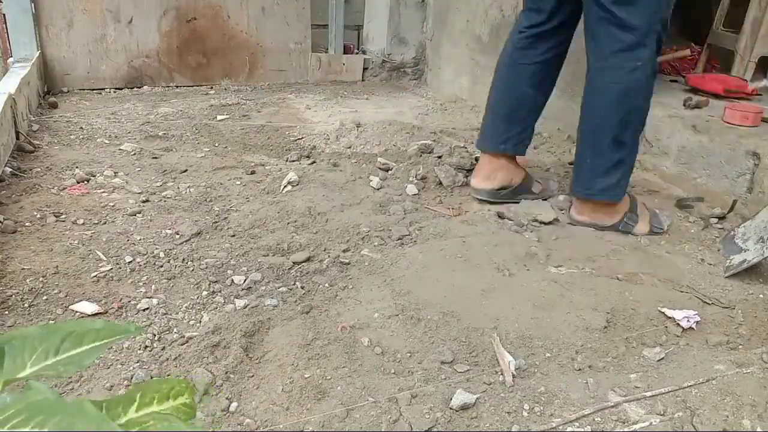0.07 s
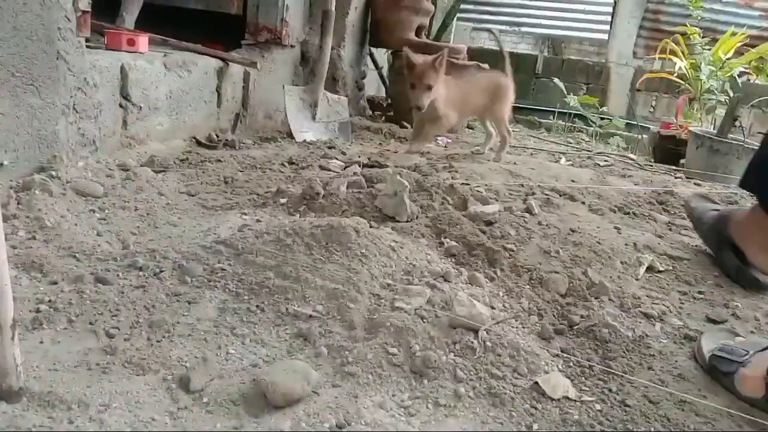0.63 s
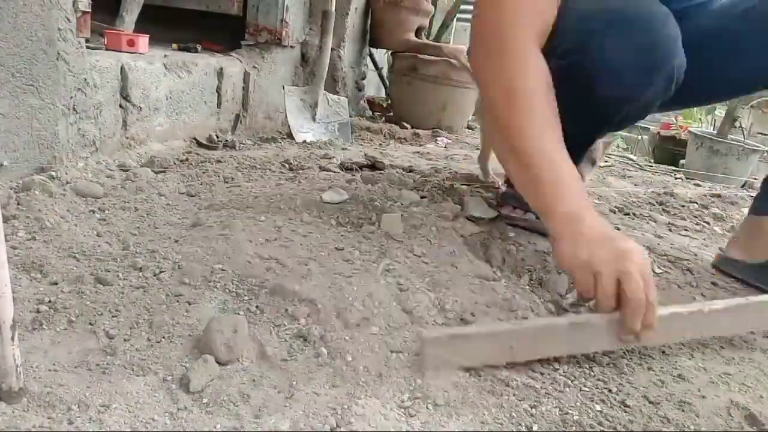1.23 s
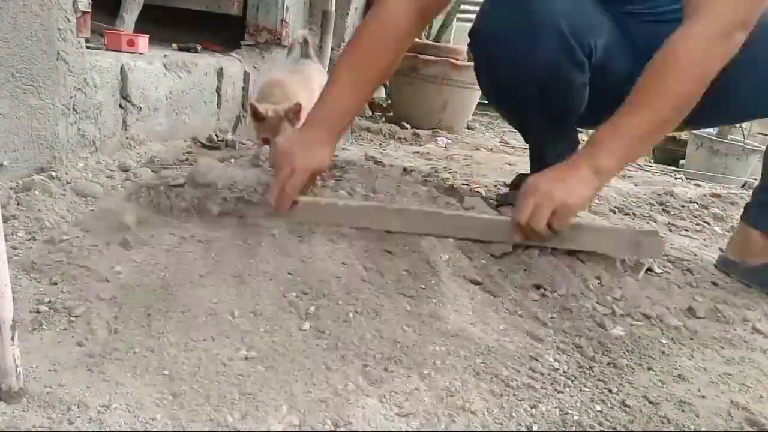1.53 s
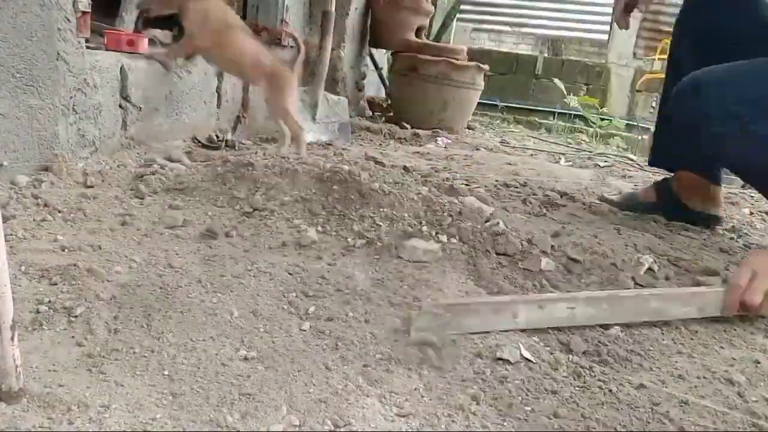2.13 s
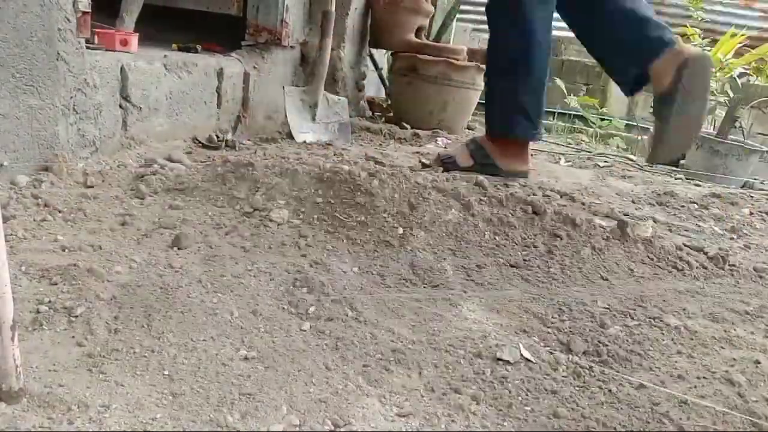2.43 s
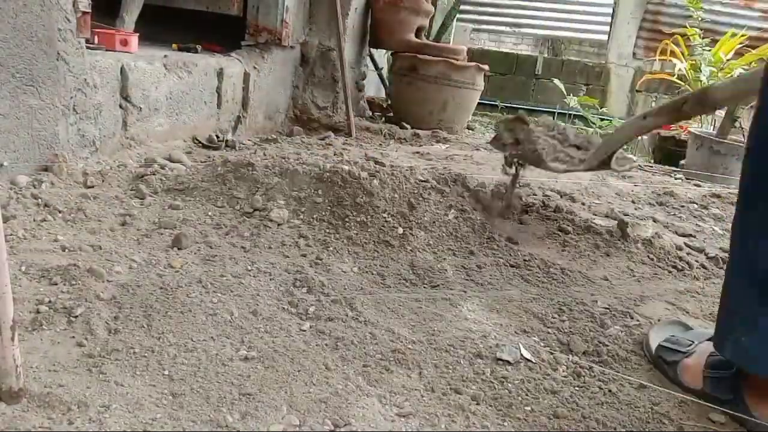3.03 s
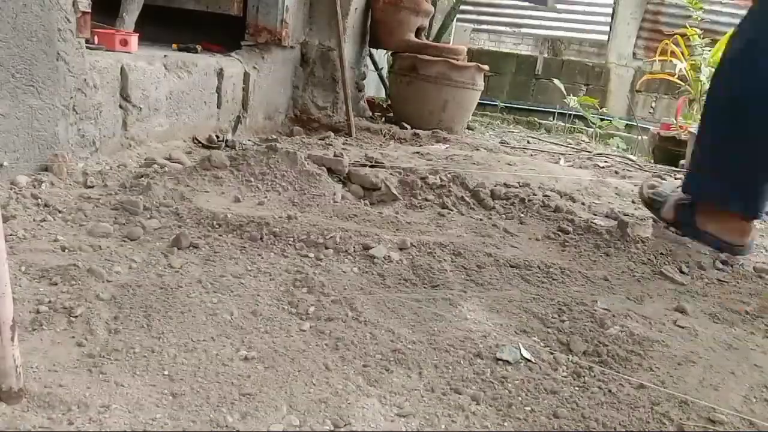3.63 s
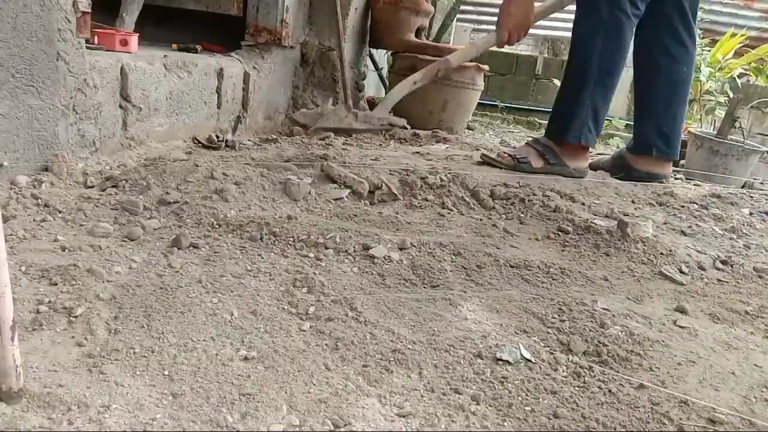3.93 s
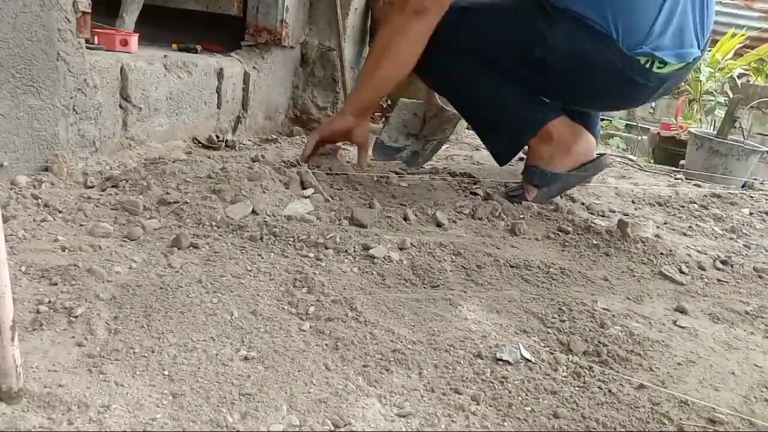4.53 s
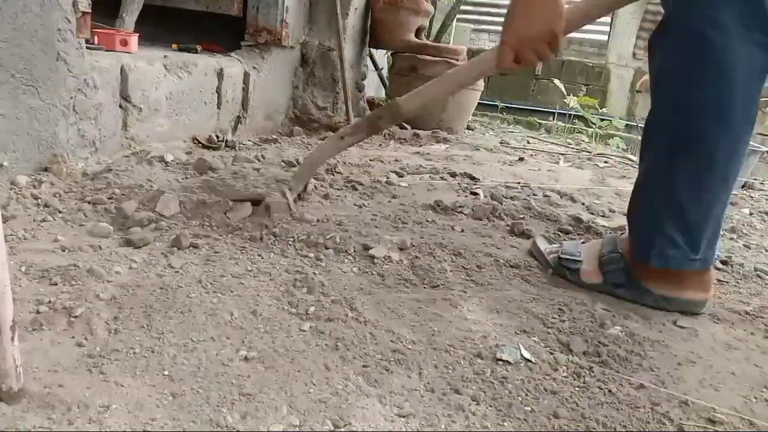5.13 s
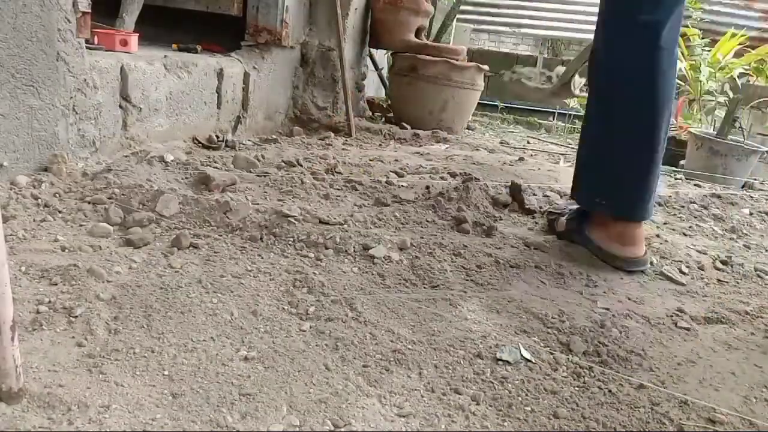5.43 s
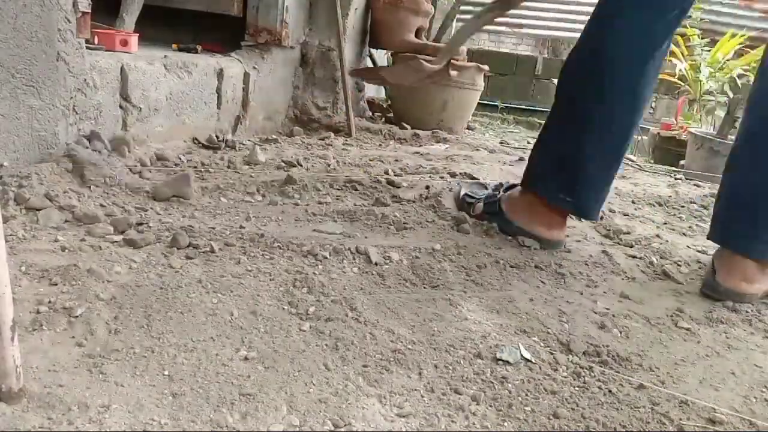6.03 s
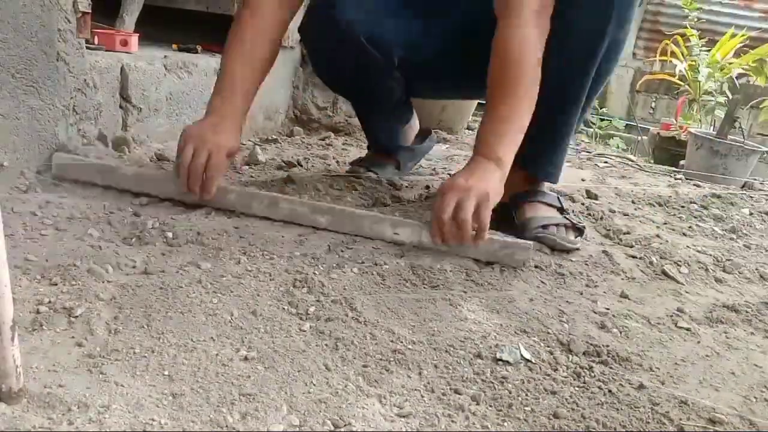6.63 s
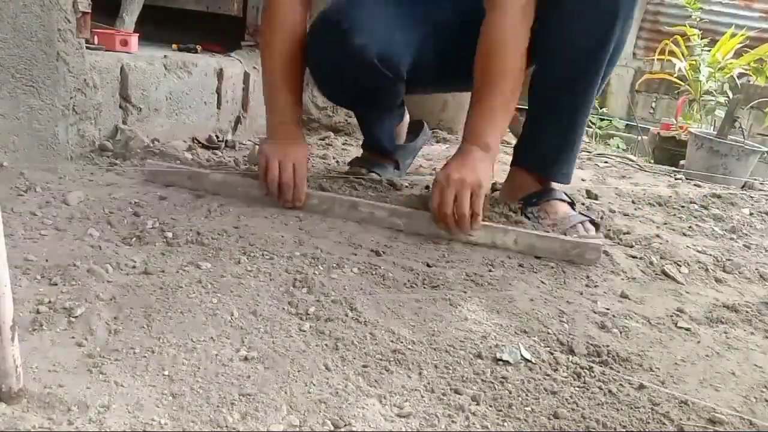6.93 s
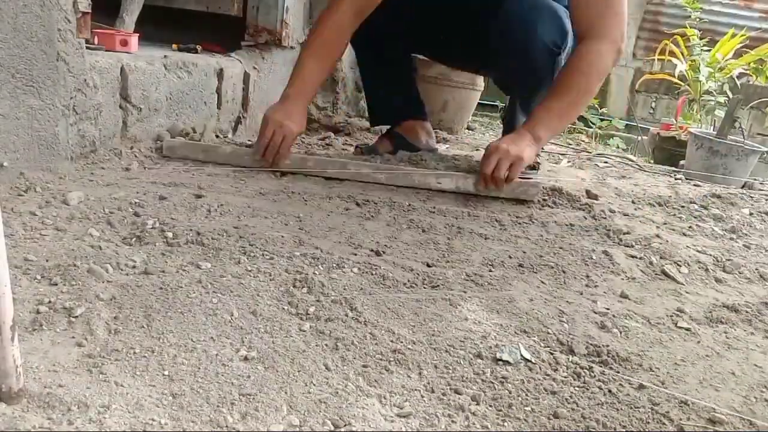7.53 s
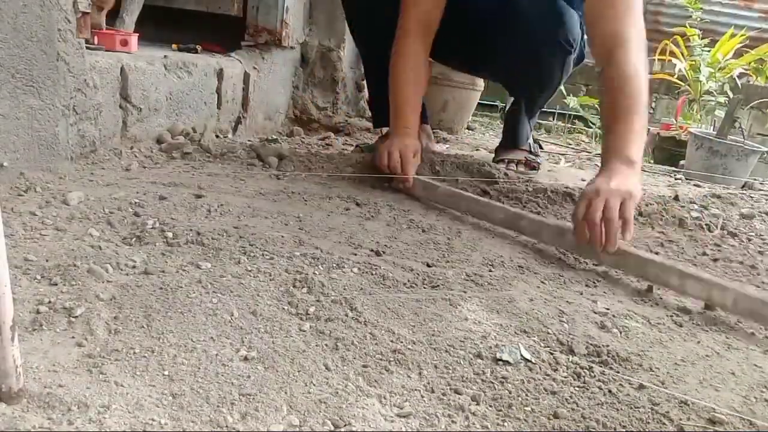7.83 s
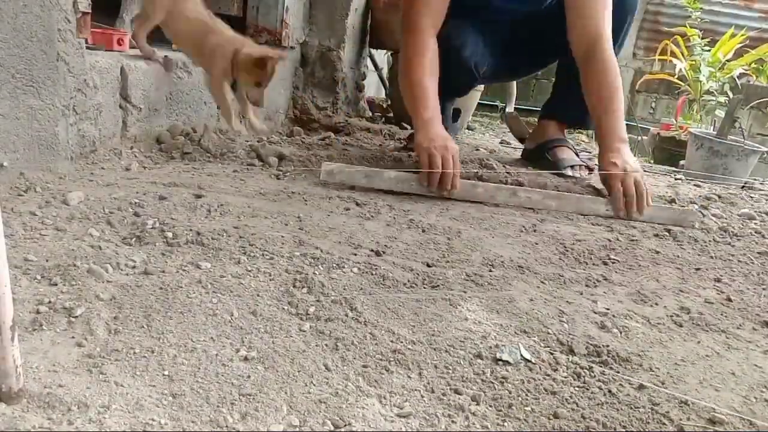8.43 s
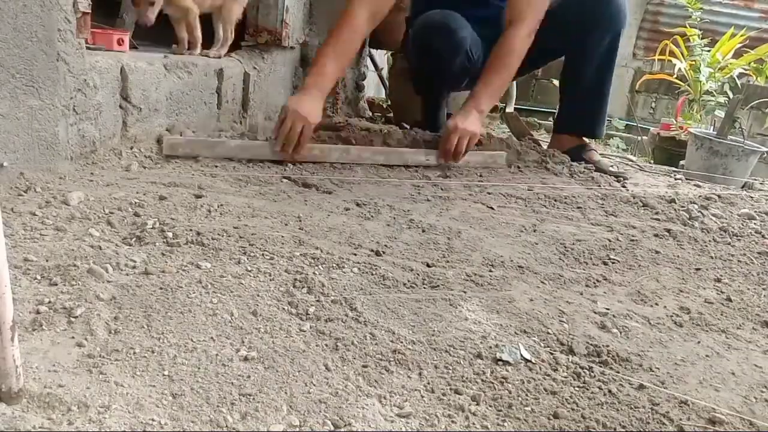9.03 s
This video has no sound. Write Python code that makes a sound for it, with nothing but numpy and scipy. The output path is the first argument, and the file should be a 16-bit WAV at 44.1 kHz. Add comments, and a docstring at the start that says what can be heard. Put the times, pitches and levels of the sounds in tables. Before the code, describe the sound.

Rapid, sped-up scraping of a board on grit gives way to a spade crunching and dumping earth, then more scraping.

```python
"""A yard of dry sandy soil is being levelled, all in quick motion. A wooden board drags over grit in runs
of short strokes, a spade bites and dumps earth, sandals scuff and pebbles click. Friction and crunch
are sums of many tiny collisions; blows excite damped modes. Faint high whines, perhaps from distant
animals, sound over a quiet outdoor rumble and a thin chirr. The small microphone rings near 1.25 kHz."""
import sys
import numpy as np
from scipy.fft import rfft, irfft, next_fast_len
from scipy.io import wavfile
from scipy.ndimage import uniform_filter1d

SR = 44100
rng = np.random.default_rng(int(sys.argv[2]) if len(sys.argv) > 2 else 0)


def write(x):
    x = np.atleast_2d(x).T
    wavfile.write(sys.argv[1], SR, np.round(np.clip(x, -1, 1) * 32767).astype(np.int16))


N = 409248

# Spectra of sliding grit and of crushed grit. Each row: frequency in Hz, relative level in dB.
SLIDING_SPECTRUM = [(50, -9), (200, -8.5), (380, 3), (950, 1), (2800, -4.5), (6000, -13), (15000, -20.5)]
CRUSHING_SPECTRUM = [(50, -17.5), (600, 2), (1800, -4), (3300, -3), (6000, -10.5), (15000, -13.5)]


def amp(db):
    """Amplitude grows tenfold with every 20 dB."""
    return 10 ** (np.asarray(db) / 20)


def unit(x):
    """Normalisation to an rms of 1."""
    return x / np.sqrt(np.mean(x ** 2) + 1e-20)


def fade(t, t60):
    """Exponential damping: the level falls 60 dB in t60."""
    return np.exp(-np.log(1000) * t / t60)


def wobble(rate):
    """Random modulation, interpolated between rate knots a second."""
    knots = rng.standard_normal(int(N * rate / SR) + 2)
    return np.interp(np.arange(N) * rate / SR, np.arange(len(knots)), knots)


def add(track, s, sound):
    """Superposition: a sound joins the track at s seconds."""
    start = round(s * SR)
    part = sound[max(-start, 0):N - start]
    track[max(start, 0):][:len(part)] += part


def shaped(x, envelope):
    """Amplitude modulation, scaled to carry just the energy of the envelope."""
    return unit(x * envelope) * np.sqrt(np.mean(envelope ** 2))


def coloured(x, spectrum, bright_db=0, uneven_db=0, body_hz=1, body_db=0, shelf_hz=2400, body_width=0.27):
    """Minimum-phase filtering by a spectrum, a treble tilt, random bumps and a broad body resonance."""
    size = 2 * next_fast_len(len(x))
    log_hz = np.log(np.fft.rfftfreq(size, 1 / SR) + 1)
    hz, db = np.transpose(spectrum)
    tilt = bright_db * np.tanh(2 * (log_hz - np.log(shelf_hz))) / 2
    bumps = uneven_db * np.interp(log_hz, np.linspace(0, log_hz[-1], num=64), rng.normal(size=64))
    body = body_db / (1 + ((log_hz - np.log(body_hz)) / body_width) ** 2)
    response_db = np.interp(log_hz, np.log(hz), db) + tilt + bumps + body
    cepstrum = irfft(np.log(amp(response_db)))[:size // 2]
    cepstrum[1:] *= 2  # folding the cepstrum makes the filter causal
    return irfft(rfft(x, size) * np.exp(rfft(cepstrum, size)))[:len(x)]


def grains(t, rate, spread_db, sand_db, pebble_hz=3300, pebble_t60=0.014, ping_samples=300):
    """Shot noise: stones collide at random, each ringing at its own pitch, over the hiss of fine sand."""
    when, pitch, weight = rng.random((3, int(rate * len(t) / SR) + 1, 1))
    age = np.arange(ping_samples)
    hz = pebble_hz * 2 ** (4 * pitch - 2)  # two octaves either way
    gain = amp(-spread_db * np.log(weight + 1 / 20)) * hz  # many weak, a few strong
    t60 = pebble_t60 * np.sqrt(pebble_hz / hz)  # small high stones ring the shortest
    pings = gain * np.sin(2 * np.pi * hz * age / SR) * fade(age / SR, t60)
    samples = (when * len(t)).astype(int) + age
    stones = np.bincount(samples.ravel(), pings.ravel(), minlength=len(t))[:len(t)]
    return unit(unit(stones) + amp(sand_db) * rng.standard_normal(len(t)))


def crunch(level_db, rise, t60, bright_db, body_hz, t, body_db=5.0, touch=0.25, settle=1.133):
    """Granular compaction: grit is touched, packs under a growing load, yields at t = 0 and settles."""
    collisions = grains(t, rate=1500, spread_db=4.0, sand_db=3.5)
    grit = coloured(collisions, CRUSHING_SPECTRUM, bright_db, uneven_db=2.5,
                    body_hz=body_hz, body_db=body_db)
    packed = np.clip(1 + t / max(rise, 1 / SR), 0, 1)
    load = (packed > 0) * (touch + (1 - touch) * packed ** 2)
    settling = fade((np.maximum(t, 0) / t60) ** settle, 0.97)
    return amp(level_db) * shaped(grit, load * settling)


def outdoor_air(rumble_db=-68.0, chirr_db=-81):
    """Ambient noise: a distant broadband rumble and a steady narrowband chirr, probably insects."""
    # Spectra of the two noises. Each row: frequency in Hz, relative level in dB.
    rumble_spectrum = [(40, -6), (130, 8), (300, -8), (550, -15), (1700, -21.5), (4000, -24.5),
                       (15000, -49)]
    chirr_spectrum = [(7800, -34), (8600, 4), (9100, 12.5), (9700, -12), (10700, -3), (12000, -14)]
    rumble = unit(coloured(rng.standard_normal(N), rumble_spectrum)) * amp(rumble_db + 0.4 * wobble(14))
    chirr = unit(coloured(rng.standard_normal(N), chirr_spectrum)) * amp(chirr_db)
    return rumble + chirr


def sand_trickle(work, calm_db=-73, stirred_db=-58, full_work_db=-44, window_s=0.18, count=320):
    """Small avalanches: sand slips in soft clumps, louder as the rms level of the work rises."""
    out, t = np.zeros(N), np.arange(-SR // 80, SR // 25) / SR
    effort = np.sqrt(np.abs(uniform_filter1d(work ** 2, round(window_s * SR))))
    stirred = np.minimum(effort / amp(full_work_db), 1) ** 0.2
    for s in (np.arange(count) + rng.random(count)) * N / SR / count:
        db = calm_db + (stirred_db - calm_db) * stirred[int(s * SR)] + rng.normal(0, 4.5)
        clump = crunch(db, rise=0.01, t60=0.045, bright_db=rng.normal(-5, 5.7),
                       body_hz=650 * 2 ** rng.normal(), t=t)
        add(out, s + t[0], clump)
    return out


def sandal_scuffs(gain_db=-8, rise=0.0055, t60=0.031, bright_db=15, body_hz=1000):
    """Brief compaction: soles land on the sand with a light crunch."""
    # Scuffs and shifting stones. Each row: start in seconds, relative peak in dB, relative treble in dB.
    scuffs = [(0.082, -44.5, -13), (0.111, -36.5, -30), (0.263, -42, -17), (0.326, -41.5, -14),
              (0.366, -39.5, -19), (0.407, -40.5, -25), (0.529, -38, -30), (0.785, -44, -18),
              (1.074, -37, -26), (1.782, -29, -14.5), (2.255, -29, -9), (2.334, -30, -16),
              (2.596, -37, -22), (3.082, -40, -33), (3.459, -29.5, -10), (3.716, -39.5, -1),
              (4.145, -36.5, -3), (4.425, -34.5, -3), (4.454, -40, -16), (4.484, -33.5, -16.5),
              (4.737, -38.5, -24.5), (4.935, -29.5, -15), (5.288, -34.5, -10), (5.531, -38, -22),
              (5.806, -38, -21), (5.947, -37.5, -20.5), (6.05, -39.5, -12.5), (8.039, -35, -24),
              (8.112, -44, -18), (8.407, -42.5, -29)]
    out, t = np.zeros(N), np.arange(-SR // 40, SR // 6) / SR
    for s, peak_db, treble_db in scuffs:
        hz = body_hz * 2 ** rng.normal(0, 0.5)
        add(out, s + rise + t[0], crunch(peak_db + gain_db, rise, t60, treble_db + bright_db, hz, t))
    return out


def stone_taps(gain_db=3, t60=0.012, ring_db=12):
    """Hard impact: a short contact gives a broadband crack, and a resonance adds a hint of pitch."""
    # Stone on board or blade. Each row: start in seconds, relative level in dB, resonance in Hz.
    taps = [(.370, -38.5, 1500), (1.706, -30, 1700), (1.836, -35.5, 3500), (2.141, -31, 2800),
            (2.977, -25.5, 3200), (3.022, -23.5, 1200), (3.550, -23, 1250), (3.899, -23.5, 900),
            (6.670, -34.5, 1150), (8.764, -37, 3700), (8.892, -30.5, 3400)]
    out, t = np.zeros(N), np.arange(SR // 20) / SR
    for s, db, hz in taps:
        noise = rng.standard_normal(len(t))
        crack = coloured(noise, CRUSHING_SPECTRUM, uneven_db=3.0, body_hz=hz, body_db=ring_db)
        add(out, s, amp(db + gain_db) * shaped(crack, fade(t, t60)))
    return out


def thuds(attack=0.002, mode_ratio=2.7, overtone_db=-6, overtone_t60=0.04, spill_db=-27, spill_t60=0.3):
    """Free vibration: a blow rings two damped modes, while earth crumbles and crumbs spill after it."""
    # Blows on board, blade or ground. Each row: start in seconds, ring level in dB, pitch in Hz,
    # 60 dB decay time in seconds, crumbling earth relative to the ring in dB.
    blows = [(.53, -52, 520, 0.076, 3), (1.268, -44.5, 351, 0.12, -11), (1.707, -10, 387, 0.01, -22),
             (1.712, -47, 525, 0.12, 6), (2.885, -47.5, 228, 0.09, 6.5), (2.977, -40.5, 637, 0.12, -6),
             (3.293, -54, 330, 0.12, 10), (3.547, -41, 44.6, 0.14, -2), (3.552, -42, 249, 0.17, 0.5),
             (4.934, -28, 159.4, 0.12, -5), (5.395, -47, 342, 0.095, 2.5), (5.709, -30.5, 112.3, 0.18, 5),
             (6.205, -44.5, 107, 0.16, 7)]
    # The dull rush of earth. Each row: frequency in Hz, relative level in dB.
    earth_spectrum = [(30, -11.5), (100, 4), (450, 2), (900, -12), (2000, -20), (8000, -77.5)]
    out, t = np.zeros(N), np.arange(SR // 4) / SR
    onset = 1 - np.exp(-t / attack)
    for s, db, hz, t60, crumble_db in blows:
        phase = 2 * np.pi * hz * t
        overtone = amp(overtone_db) * np.sin(mode_ratio * phase) * fade(t, overtone_t60)
        ring = np.sqrt(2) * (np.sin(phase) + overtone) * fade(t, t60)
        earth = shaped(coloured(rng.standard_normal(len(t)), earth_spectrum), fade(t, t60))
        collisions = grains(t, rate=510, spread_db=5.5, sand_db=-4.5)
        crumbs = amp(spill_db) * shaped(coloured(collisions, SLIDING_SPECTRUM), fade(t, spill_t60))
        add(out, s, amp(db) * (ring + amp(crumble_db) * (earth + crumbs)) * onset)
    return out


def rub(db, length, t, steepness=7, drag_db=-19, drag_stretch=2.0, firm_db=-52, bright_per_db=0.18):
    """Sliding friction: an edge shears grit, pressing within a longer light drag; firmer is brighter."""
    collisions = grains(t, rate=1300, spread_db=3, sand_db=2)
    grit = coloured(collisions, SLIDING_SPECTRUM, bright_db=bright_per_db * (db - firm_db), uneven_db=3.0)
    press, drag = (1 / np.sqrt(1 + np.abs(2 * t / span) ** steepness)
                   for span in (length, drag_stretch * length))
    return amp(db) * shaped(grit, np.maximum(press, amp(drag_db) * drag))


def board_strokes(gain_db=-1, judder_db=3.8):
    """Stick-slip: the board's edge catches as it works to and fro over the grit, so the level judders."""
    # Slides of the board, now and then of a sole.
    # Each row: midpoint in seconds, relative level in dB, length in seconds.
    strokes = [(.624, -54.5, 0.033), (.835, -61.5, 0.039), (1.207, -45.5, 0.056), (1.321, -43.5, 0.05),
               (1.433, -47.5, 0.049), (1.558, -45.5, 0.05), (1.69, -45.5, 0.016), (1.813, -49, 0.015),
               (1.847, -46, 0.026), (2.109, -41.5, 0.022), (2.143, -37.5, 0.027), (2.193, -44, 0.036),
               (2.29, -50, 0.031), (2.936, -51.5, .02), (4.3, -53.5, 0.056), (6.522, -51, 0.022),
               (6.578, -48.5, 0.033), (6.633, -45, 0.033), (6.683, -44.5, 0.03), (6.733, -44, 0.025),
               (6.771, -45, 0.02), (6.813, -43.5, 0.013), (6.846, -48, 0.012), (6.91, -49.5, 0.043),
               (6.962, -44.5, 0.014), (7.12, -48, 0.014), (7.209, -51, .028), (7.298, -48.5, 0.015),
               (7.463, -55.5, 0.038), (7.519, -49.5, 0.023), (7.571, -48.5, 0.021), (7.607, -49.5, .02),
               (7.686, -46, 0.023), (7.735, -40.5, 0.014), (7.827, -43, 0.031), (7.907, -40, 0.029),
               (8.015, -48, 0.011), (8.074, -51.5, 0.012), (8.549, -58.5, 0.12), (8.651, -49, 0.035),
               (8.726, -51.5, 0.015), (8.781, -45.5, 0.013), (8.822, -45.5, 0.017), (8.861, -41, 0.0093),
               (8.894, -46, .026), (9.028, -53, 0.037), (9.086, -47.5, 0.015), (9.128, -51, 0.012),
               (9.167, -47, 0.011)]
    out, t = np.zeros(N), np.arange(-SR // 7, SR // 7) / SR
    for s, db, length in strokes:
        add(out, s + t[0], rub(db, length, t))
    return out * amp(gain_db + judder_db * wobble(160))


def distant_whines(octave_db=-22, waver=0.028, roughness=0.61, octave_drop_s=0.15):
    """Random frequency and amplitude modulation roughen short arching tones with a weak octave."""
    # Thin calls. Each row: start in seconds, length in seconds, top of the pitch arch in Hz, level in dB.
    calls = [(1.484, .04, 670, -59), (4.838, 0.018, 685, -53.5), (4.878, 0.019, 650, -52),
             (8.194, 0.11, 1880, -75), (8.516, 0.12, 1780, -65)]
    out = np.zeros(N)
    for s, length, top_hz, db in calls:
        progress = np.linspace(0, 1, round(length * SR))
        arch = 0.5 ** (((progress - 0.5) * length / octave_drop_s) ** 2)
        hz = top_hz * arch * (1 + waver * wobble(160)[:len(progress)])
        phase = 2 * np.pi * np.cumsum(hz) / SR
        swell = 2 * np.sqrt(progress * (1 - progress))
        flutter = 1 + roughness * wobble(294)[:len(progress)]
        tone = np.sin(phase) + amp(octave_db) * np.sin(2 * phase)
        add(out, s, amp(db) * swell * flutter * tone)
    return out


def spade_bites(gain_db=-1.0):
    """Heavy compaction under the spade excites blade and hollow, whose resonance differs with each load."""
    # Bites and thrown earth. Each row: peak time in seconds, relative level in dB, rise in seconds,
    # decay time in seconds, treble tilt in dB, body resonance in Hz.
    bites = [(3.023, -22.5, 0.0051, 0.038, 5.5, 2900), (3.187, -32, 0.0071, 0.073, 5, 2070),
             (3.297, -27.5, 0.011, 0.037, -1, 3000), (3.552, -27.5, 0.016, 0.045, 1.5, 1100),
             (3.901, -26.5, 0.023, 0.04, 3.5, 810), (4.234, -28, 0.018, 0.048, 0, 483),
             (5.121, -26, 0.016, 0.035, 3.5, 560), (5.351, -29.5, 0.01, 0.074, 4.5, 716),
             (5.602, -28, 0.011, 0.082, 3, 900), (5.711, -24.5, 0.0039, 0.063, -12.5, 1500),
             (5.863, -32.5, 0.014, 0.11, 1.5, 800), (6.206, -29.5, 0.016, 0.063, -0.5, 595)]
    out, t = np.zeros(N), np.arange(-SR // 24, SR // 6) / SR
    for s, db, rise, t60, bright_db, body_hz in bites:
        add(out, s + t[0], crunch(db + gain_db, rise, t60, bright_db, body_hz, t))
    return out


def scene():
    """Superposition in a free field: the sources sum, and the open yard adds no echo."""
    work = board_strokes() + sandal_scuffs() + spade_bites()
    return (work + stone_taps() + thuds() + sand_trickle(work) + distant_whines() + outdoor_air())[None]


def record(dry):
    """Linear filtering: the microphone's resonances colour the sound and a low-pass limits its band."""
    # The microphone's response. Each row: frequency in Hz, gain in dB.
    response = [(1020, 0.5), (1150, 5.5), (1255, 12), (1430, 3), (7300, -0.5), (8100, -11), (9600, -4),
                (11000, -7), (13500, -20.5), (14800, 1.5), (15500, -7)]
    cutoff_hz, transition_hz = 15650, 600
    size = next_fast_len(N + SR)
    spectrum = rfft(coloured(dry[0], response), size)
    passband = np.clip(0.5 + (cutoff_hz - np.fft.rfftfreq(size, 1 / SR)) / transition_hz, 0, 1)
    return irfft(spectrum * passband, size)[None, :N]


dry = scene()
out = record(dry)
write(out)
```